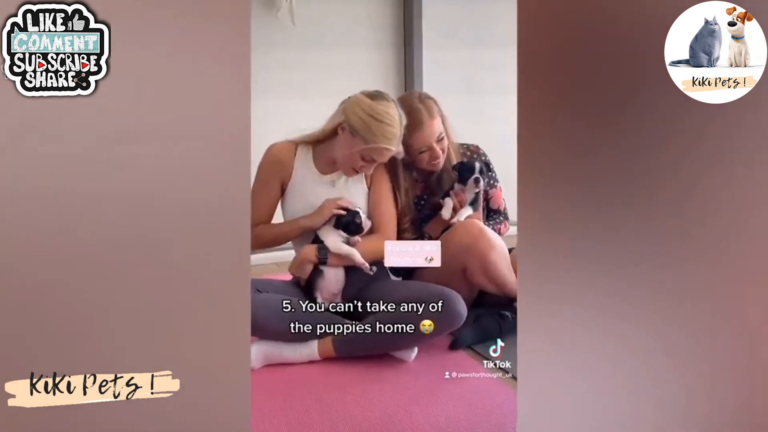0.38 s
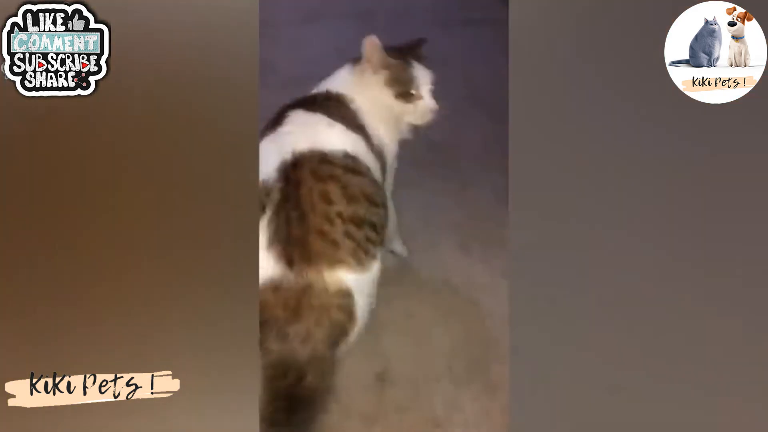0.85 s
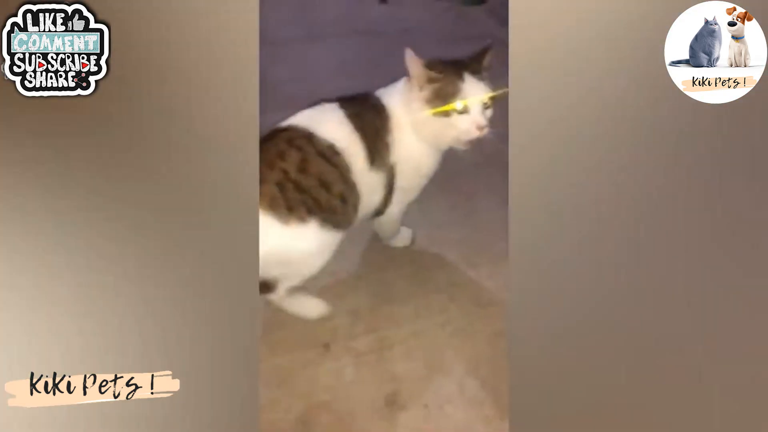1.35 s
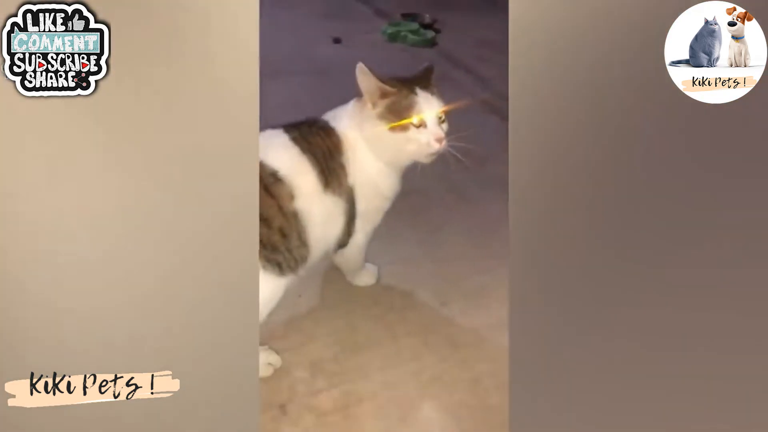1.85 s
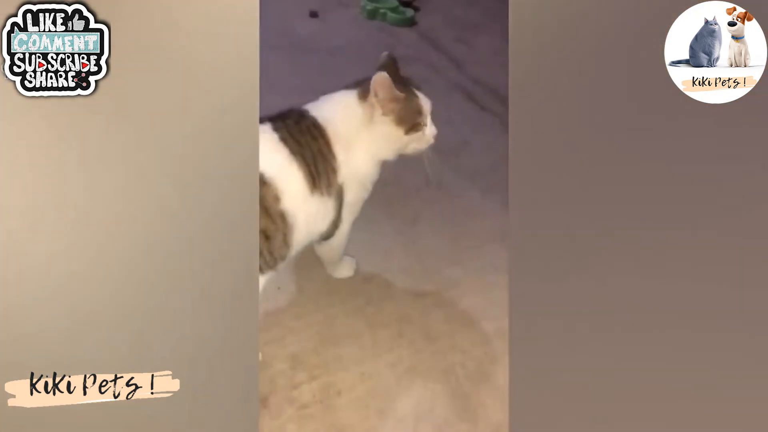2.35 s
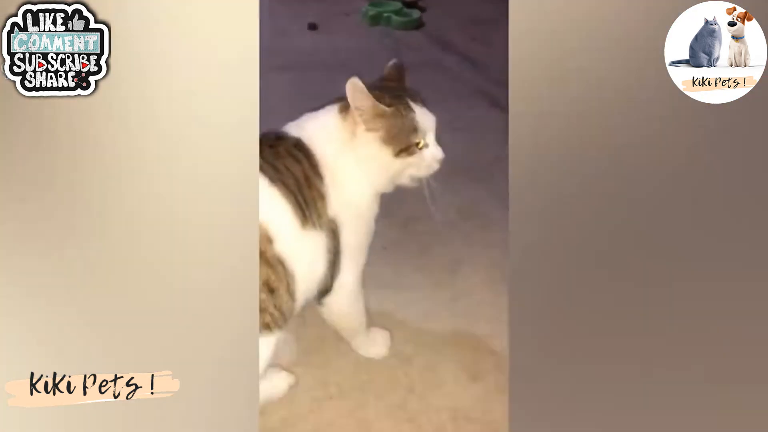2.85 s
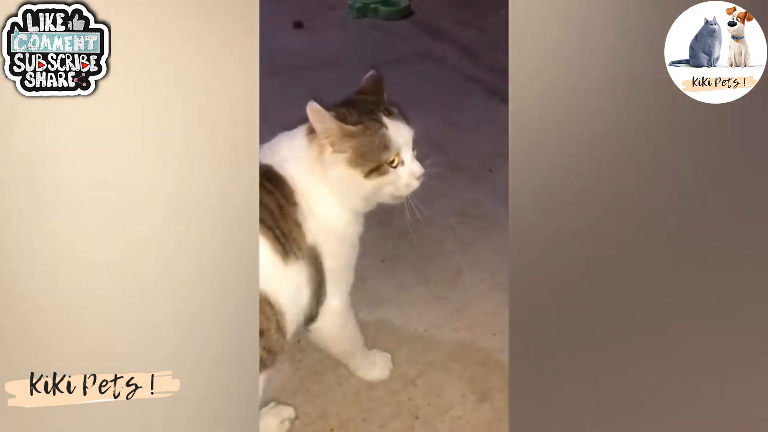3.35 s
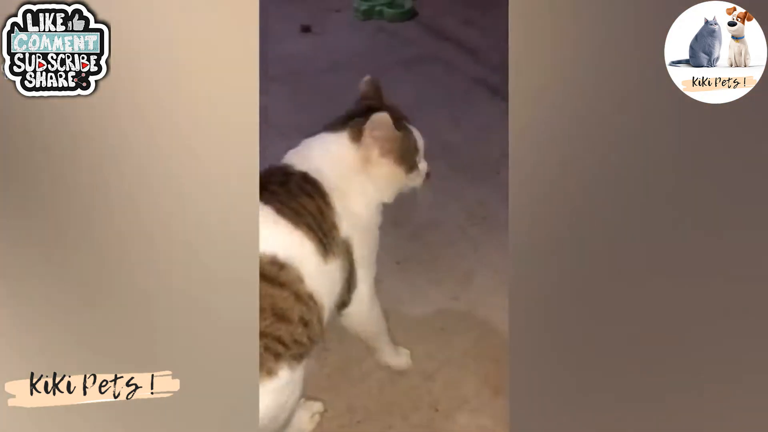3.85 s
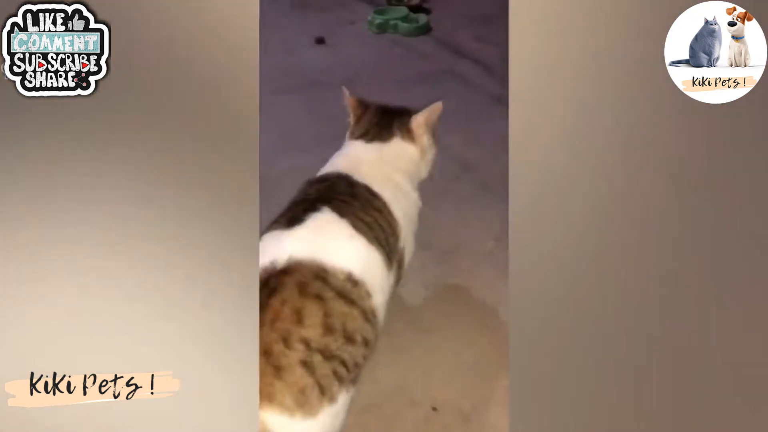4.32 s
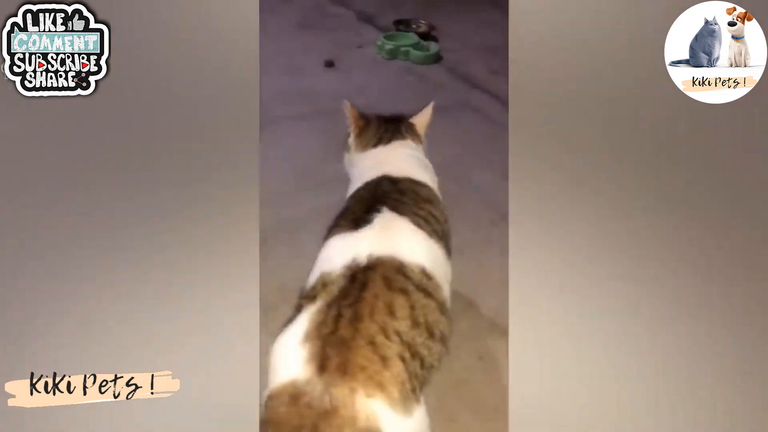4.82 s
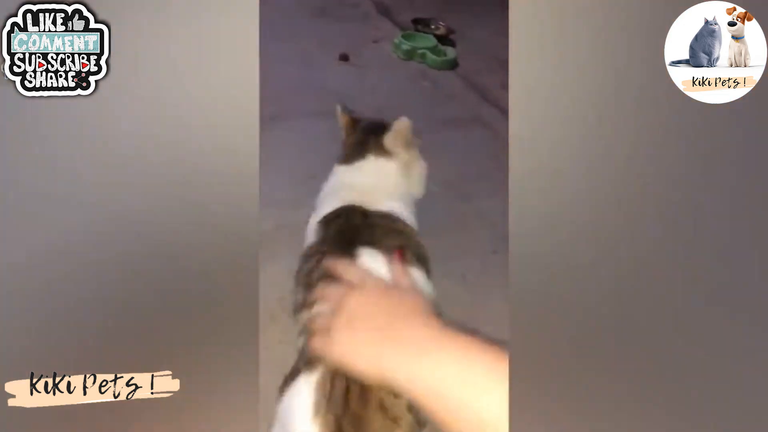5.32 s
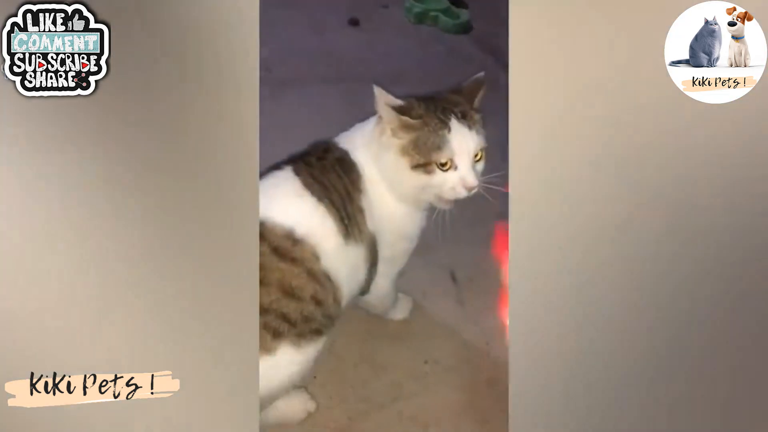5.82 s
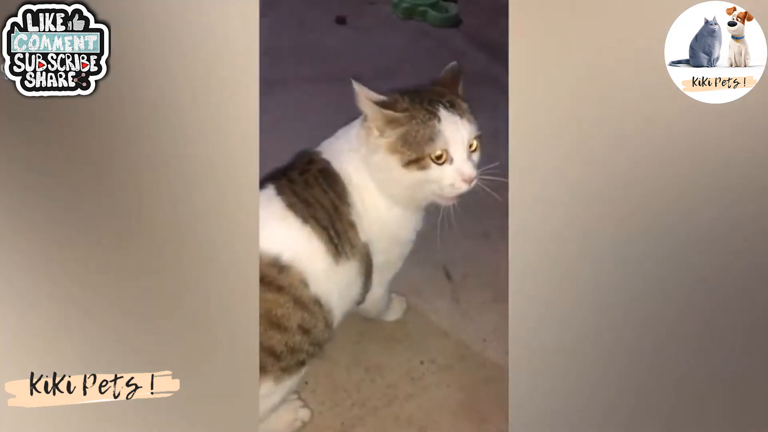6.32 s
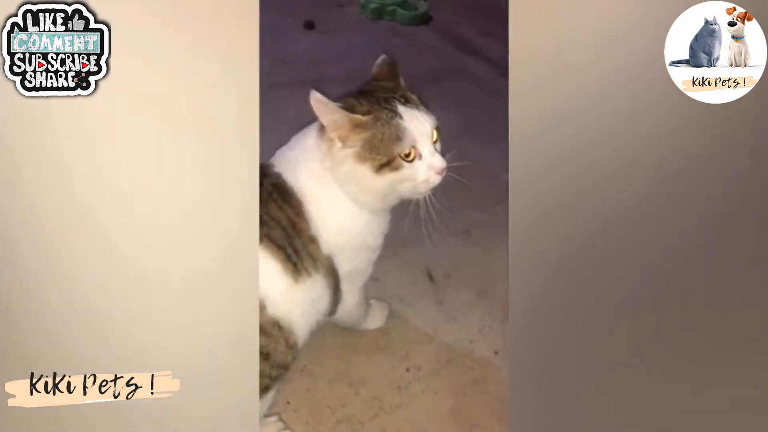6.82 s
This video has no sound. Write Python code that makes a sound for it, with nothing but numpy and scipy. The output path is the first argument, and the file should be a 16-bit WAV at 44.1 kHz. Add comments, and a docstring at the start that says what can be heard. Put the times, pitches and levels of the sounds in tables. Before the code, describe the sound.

Two drawn-out cat yowls, a small breathy gasp between them, with faint scuffs on paving and a low, distant traffic hum.

```python
"""A paved yard at night: a cat yowls twice, close to a phone. Each yowl is a stack of overtones locked to a
gliding pitch, its balance shifting as the mouth opens and the head turns; the second starts in a hoarse croak.
Fluttering noise makes the gasp between the calls; noise bursts and low thumps make scuffs and footfalls on the
paving. A short decaying noise tail gives the yard's echo, fading tones the echo of an earlier call, and low
coloured noise with slow drones the far traffic."""
import sys
import numpy as np
from scipy import signal
from scipy.fft import rfft, irfft, next_fast_len
from scipy.io import wavfile
from scipy.ndimage import map_coordinates

SR = 44100
rng = np.random.default_rng(int(sys.argv[2]) if len(sys.argv) > 2 else 0)


def output_pcm(signal):
    """Save a mono or channel-first signal as 16-bit PCM at the path in sys.argv[1].

    Samples are clipped to [-1, 1] before scaling.
    """
    pcm = np.clip(np.atleast_2d(signal).T, -1, 1) * 32767
    wavfile.write(sys.argv[1], SR, np.round(pcm).astype(np.int16))


def decibels_to_gain(level_db):
    """Convert a level in decibels to a linear amplitude gain (20 dB per decade)."""
    exponent = np.asarray(level_db, float) / 20
    return 10 ** exponent


N = 316638
TIME = np.arange(N) / SR  # [s]

# Levels of each yowl: (time [s], overtone 1 [dB], overtone 2 [dB], overtone 3 [dB], treble [dB])
FIRST_LEVELS = [(0.6, -30.5, -44, -64, -52), (0.65, -38.5, -48.5, -34.5, -34), (0.74, -38, -35.5, -43, -72),
                (0.88, -34.0, -19, -41.5, -45.5), (0.96, -34, -32, -49.5, -62),
                (1.06, -32.5, -23, -40.5, -59), (1.16, -42, -36.5, -48, -63), (1.22, -64, -31, -47, -62.0),
                (1.27, -43, -15, -33, -28.5), (1.34, -31, -16.0, -26.5, -50),
                (1.39, -44, -17.5, -19.5, -42), (1.53, -38.5, -21, -18, -30), (1.66, -40, -11, -25, -50),
                (1.73, -27.5, -35, -44, -50.5), (1.81, -35, -8, -35, -39.5), (1.92, -37.5, -19, -16, -40),
                (2.05, -34, -13, -27.5, -62.5), (2.17, -28, -33.5, -55, -60.5),
                (2.34, -36.5, -26, -43, -58), (2.4, -47, -38.5, -49, -71), (2.46, -38.5, -38.5, -51, -59),
                (2.56, -36.0, -36.0, -33, -52.5), (2.7, -38, -40, -59, -62), (2.94, -34.5, -59, -53, -73),
                (3.01, -41.5, -43.5, -52.5, -64), (3.17, -31.5, -57, -54.5, -90),
                (3.36, -33.5, -47, -57, -78), (3.44, -57, -56, -54, -70), (3.5, -31, -56.5, -59, -68.0),
                (3.6, -48, -66, -71, -65)]
SECOND_LEVELS = [(4.0, -32, -18, -12, -30), (4.03, -38.5, -21, -17, -20), (4.19, -36.5, -25, -17, -32.5),
                 (4.29, -37.5, -21.5, -11, -22.5), (4.36, -36.5, -22.5, -16.5, -25),
                 (4.57, -35.5, -21.5, -9.0, -28.5), (4.74, -36.5, -26.5, -5.5, -30.5),
                 (4.88, -34.5, -18, -17.5, -31.5), (4.97, -31, -15, -36.5, -41.5),
                 (5.15, -32.5, -14.5, -26, -37), (5.39, -32, -13.0, -34.5, -37.5),
                 (5.7, -29.5, -13.0, -32.5, -36.5), (5.93, -31.5, -14.5, -42.5, -37),
                 (6.02, -31, -23.0, -50.0, -38.5), (6.15, -26, -22.0, -52, -41.5),
                 (6.19, -32.0, -21.0, -53, -40), (6.34, -29.5, -15, -45, -40), (6.48, -31, -30, -44.0, -41),
                 (6.63, -30.0, -34.5, -48.5, -56), (6.8, -30.5, -39.0, -43, -55.5),
                 (6.84, -39.0, -51, -61, -65), (6.93, -60.5, -57, -76.5, -68.0)]
# Pitch of each yowl: (time [s], pitch [Hz])
FIRST_PITCH = [(0.6, 175), (0.64, 259.6), (0.701, 332), (0.75, 368.7), (0.84, 399.6), (1.161, 448),
               (1.259, 439.5), (1.409, 498.3), (1.5, 516.1), (1.62, 510.4), (1.67, 489), (1.76, 503.6),
               (1.801, 484.5), (1.96, 495.7), (2.24, 449.2), (2.33, 418.4), (2.61, 370.7), (2.68, 379),
               (2.86, 368.9), (3.13, 377.4), (3.22, 367.6), (3.48, 329.7), (3.52, 306), (3.6, 306.5)]
SECOND_PITCH = [(4.001, 532), (4.111, 501.6), (4.149, 511.8), (4.209, 499.7), (4.33, 552.4), (4.43, 552.2),
                (4.598, 529.4), (4.76, 527.7), (4.881, 514.4), (4.961, 488.3), (5.39, 448.1), (5.73, 431.4),
                (5.97, 409.3), (6.101, 428), (6.14, 424.4), (6.201, 403.8), (6.49, 386.3), (6.731, 389),
                (6.79, 359), (6.82, 307), (6.851, 349.5), (6.93, 332)]
# Mouth resonance, rising as the jaw opens: (time [s], mouth [Hz], upper over lower throat resonance [dB])
MOUTH_AND_THROAT = [(.8, 2190, -36), (1.25, 2110, -17), (1.499, 2813, -20), (1.798, 2445, -15),
                    (2.0, 2584, -14.5), (2.3, 2250, -3), (4.052, 2550, -9.5), (4.398, 3126, -11.5),
                    (4.799, 2800, -7.5), (4.968, 2367, -10), (5.601, 2120, -11), (5.999, 2030, -11),
                    (6.55, 1963, -22.5)]
# How the throat's ring follows overtone 2, overtone 3 and treble: one slope each [dB per dB]
RING_SLOPES = [0.39, 0.11, 0.44]
# Levels of the same three in full voice, where the ring is at its own setting: one each [dB]
FULL_VOICE_LEVELS = [-15, -30, -35]
# Moments where the voice catches: (middle [s], half length [s], level change [dB])
VOICE_CATCHES = [(1.73, 0.025, -8), (3.303, 0.012, -9), (3.542, 0.012, -11)]
# Uneven beating of the folds before the second yowl settles: (time [s], beats [per s], level [dB])
HOARSE_BEATS = [(3.936, 274, -38), (3.955, 332, -24.5), (3.973, 358, -17), (3.991, 360, -14.5),
                (4.009, 500, -16), (4.042, 640, -32.5), (4.1, 515, -51.5)]
# Colour of the croak: (frequency [Hz], relative level [dB])
CROAK_COLOUR = [(88, -80), (150, -44.5), (312, -13.5), (532, -33), (810, -9.5), (1350, -17), (1570, -2),
                (2030, -25.5), (2720, -22), (3450, -33), (6200, -29), (12000, -60), (15600, -95.5),
                (22000, -120)]
# Air drawn in between the calls: (time [s], level [dB])
GASP_LEVELS = [(3.659, -84.5), (3.72, -56.5), (3.8, -44), (3.882, -57), (3.928, -67)]
# Colour of the gasp: (frequency [Hz], relative level [dB])
GASP_COLOUR = [(290, -34.5), (500, -5.5), (782, -24), (972, -3.5), (1350, 3), (1720, -21), (3910, -22.5),
               (9000, -48), (11700, -95), (19800, -120)]
# Gulps in the gasp and the lips parting: (time [s], relative air level [dB], relative thump level [dB])
GULPS = [(3.782, -22.5, -37), (3.805, -24.5, -35.5), (3.92, -27, -49)]
# Scuffs on the paving: (time [s], relative level [dB], rise [s], t60 [s])
SCUFFS = [(0.6685, -30, 0.0096, 0.094), (0.9567, -29, 0.01, 0.054), (2.2188, -23.5, 0.025, 0.068),
          (2.248, -29.5, 0.013, 0.11), (2.3956, -51, 0.0088, 0.36), (2.5095, -43, 0.0028, 0.14),
          (2.606, -37, 0.0068, 0.14), (2.6359, -40.5, 0.0053, 0.14), (3.237, -52, 0.0034, 0.062),
          (3.343, -53, 0.0044, 0.078), (3.5759, -31, 0.0074, 0.047), (6.8176, -38.5, 0.014, 0.04)]
# Colour of the grit, used from its second row on: (frequency [Hz], relative level [dB])
GRIT_COLOUR = [(1470, -39), (2500, -10), (4840, -10), (5280, -9), (6820, -13.5), (10000, -13),
               (12500, -27.5), (16200, -56.5), (22000, -120)]
# Faint rustle of fur and clothes as cat and person move: (time [s], relative level [dB])
RUSTLE_LEVELS = [(.55, -73), (.65, -56.5), (2.2, -56.5), (2.75, -56.5), (2.9, -62), (3.4, -56), (3.7, -58),
                 (6.8, -62), (7.1, -59.5)]
# Soft footfalls: (time [s], relative level [dB], tone [Hz])
FOOTFALLS = [(0.953, -51, 300), (2.299, -50, 175), (2.416, -53, 223.6), (2.614, -42, 180.8),
             (2.678, -47, 256.5), (5.19, -42.5, 210.2)]
# Decay of the yard's echo: (frequency [Hz], t60 [s])
YARD_DECAY = [(300, 0.8), (1500, 0.55), (8000, 0.067)]
# Fading overtones of the earlier call: (frequency [Hz], starting level [dB], t60 [s])
EARLIER_OVERTONES = [(438, -49.5, 0.53), (800, -49, 0.52), (880, -36, 0.14), (1310, -47, 0.34),
                     (1370, -48, 0.69), (1820, -53, 0.37), (2250, -45, 0.12), (2760, -56, 0.26)]
# Colour of the night air and traffic: (frequency [Hz], relative level [dB])
NIGHT_COLOUR = [(15, -57.5), (30, -16.5), (40, 9.5), (50, 1.5), (87, 5.5), (355, 2), (581, -7.5), (978, -6),
                (1440, -10.5), (1970, -12.5), (2840, -17), (5000, -22), (11000, -30.5)]
# Far engines droning in turn: (middle [s], length [s], tone [Hz], level [dB])
DRONES = [(0.49, 1.4, 175.7, -61.5), (2.693, 1.3, 99.6, -57), (6.35, 0.91, 71.9, -58)]


def unit(x):
    """Scales a sound to rms 1."""
    return x / np.sqrt(np.mean(x ** 2) + 1e-20)


def along(points, hz):
    """Reads (frequency [Hz], value) points on a log frequency axis."""
    f, v = np.transpose(points)
    return np.interp(np.log(hz + 1), np.log(f + 1), v)


def wobble(rate, t=TIME):
    """A smooth random curve with that many knots a second."""
    knots = rng.standard_normal(int(N * rate / SR) + 4)
    return map_coordinates(knots, [t * rate])


def coloured(spectrum):
    """Noise filtered to a spectrum, at rms 1."""
    size = next_fast_len(N)
    gain = decibels_to_gain(along(spectrum, np.fft.rfftfreq(size, 1 / SR)))
    return unit(irfft(rfft(rng.standard_normal(N), size) * gain, size)[:N])


def burst(start, rise, t60):
    """An envelope that swells from its start and dies away exponentially."""
    t = np.arange(SR // 2) / SR
    shape = (1 - np.exp(-t / abs(rise))) * decibels_to_gain(-60 * t / abs(t60))
    return np.pad(shape, (round(start * SR), N))[:N]


def resonance(hz, centre_hz, width_hz):
    """Gain of a flat-topped, steep-sided resonance."""
    return 1 / (1 + ((hz - centre_hz) / width_hz) ** 4)


def brightness(db, pitch):
    """Gain of a resonance: slack folds at low pitch dull it, and a closing mouth shuts it in."""
    tautness = np.clip((pitch - 340) / 50, 0, 1)
    opening = np.clip((db + 63.5) / 8, 0, 1)
    return tautness * decibels_to_gain(db) * opening


def yowl(rows, melody, fourth_db, fourth_share, ring_db):
    """Steady vocal folds: overtones locked to the pitch, the upper ones picked out by moving resonances."""
    span = slice(round(rows[0][0] * SR), round(rows[-1][0] * SR))
    t = TIME[span]
    pitch = np.interp(t, *np.transpose(melody))
    times, *columns = np.transpose(rows)
    *low_db, treble_db = [np.interp(t, times, column) for column in columns]
    times, *columns = np.transpose(MOUTH_AND_THROAT)
    mouth_hz, upper_db = [np.interp(t, times, column) for column in columns]

    mouth_db = treble_db + 1.5
    throat_db = ring_db
    for slope, db, full in zip(RING_SLOPES, [*low_db[1:], treble_db], FULL_VOICE_LEVELS):
        throat_db = throat_db + slope * (db - full)
    # the fourth overtone lies between treble and third, and swells on its own
    between = treble_db + fourth_share * (low_db[2] - treble_db)
    low_db.append(fourth_db + between + 1.7 * wobble(8, t))

    tick = (60 * t - 0.4) % 1 - 0.5  # the tone ticks faintly sixty times a second
    slip = 0.06 * decibels_to_gain(wobble(30, t)) * tick
    phase = 2 * np.pi * np.cumsum(pitch * (1 + 0.00064 * wobble(60, t))) / SR + slip
    blur = 0.022 * wobble(500, t)  # breath smears the high overtones
    voice = 0
    for k, db in enumerate(low_db, 1):
        gain = decibels_to_gain(db + 0.13 * wobble(36, t)) * np.sqrt(2)
        voice = voice + gain * np.sin(k * phase - k * k * 0.6)

    mouth_gain, throat_gain = brightness(mouth_db, pitch), brightness(throat_db, pitch)
    for k in range(5, 24):
        hz = k * pitch
        lower = resonance(hz, 2.01 * mouth_hz, 240)  # the lower throat resonance stays near twice the mouth's
        upper = decibels_to_gain(upper_db) * resonance(hz, 6165, 430)
        throat = lower + upper + decibels_to_gain(-5.5 - 1.1 * k)  # a floor between the resonances
        gain = mouth_gain * resonance(hz, mouth_hz, 340) + throat_gain * throat
        swell = decibels_to_gain(3.5 * wobble(9, t))  # each overtone swells on its own
        voice += gain * swell * np.sin(k * (phase + blur - k * 0.49))

    hiss = coloured([(2600, -12.5), (3700, -20), (5500, -6), (6250, -1), (7000, -6.5), (11000, -26.5)])
    breath = decibels_to_gain(throat_db - 15 + 2.9 * wobble(29, t)) * hiss[span]
    shimmer = 1 + decibels_to_gain(-36.5) * unit(np.diff(wobble(300, t), prepend=0))
    catch = decibels_to_gain(sum(db * np.exp(-((t - middle) / half) ** 4) for middle, half, db in VOICE_CATCHES))
    fade = np.clip(np.minimum(t - t[0], t[-1] - t) / 0.017, 0, 1)  # 17 ms at either end
    return np.pad(catch * fade * (voice * shimmer + breath), (span.start, N - span.stop))


def croak():
    """Uneven beats smear every overtone into a band; air hisses more as the effort grows."""
    times, rate, db = np.transpose(HOARSE_BEATS)
    span = slice(round(times[0] * SR), round(times[-1] * SR))
    t = TIME[span]
    rate, db = np.interp(t, times, rate), np.interp(t, times, db)
    phase = 2 * np.pi * np.cumsum(rate) / SR
    bands = 0
    for k in range(1, 9):
        gain = decibels_to_gain(along(CROAK_COLOUR, k * rate) + 3.7 * wobble(150, t))
        bands = bands + gain * np.sin(k * phase + 1.46 * wobble(200, t))
    hiss = decibels_to_gain(0.3 * (db + 18) - 5) * coloured(CROAK_COLOUR)[span]
    return np.pad(decibels_to_gain(db) * (unit(bands) + hiss), (span.start, N - span.stop))


def gasp():
    """Turbulent air in the open mouth: fluttering noise, with short gulps and their low thumps."""
    times, db = np.transpose(GASP_LEVELS)
    air = decibels_to_gain(np.interp(TIME, times, db, -120, -120) + 3.2 * wobble(90))
    thumps = 0
    for start, air_db, thump_db in GULPS:
        air = air + decibels_to_gain(air_db + 3) * burst(start, 0.0034, 0.022)
        tone = np.sin(2 * np.pi * 150 * (TIME - start))
        thumps = thumps + decibels_to_gain(thump_db + 12) * burst(start, 0.00276, 0.086) * tone
    return air * coloured(GASP_COLOUR) + thumps


def feet():
    """Friction on grit as grainy noise in scuffs and rustles, and dull footfalls as short decaying tones."""
    grains = decibels_to_gain(3 * wobble(400))
    grit = unit(grains * coloured([(200, -9.5), (1200, -4.5)] + list(GRIT_COLOUR)[1:]))
    rustle = decibels_to_gain(np.interp(TIME, *np.transpose(RUSTLE_LEVELS)) + 3.8 * wobble(20))
    scuffs = sum(decibels_to_gain(db + 0.5) * burst(start, rise, t60) for start, db, rise, t60 in SCUFFS)
    footfalls = 0
    for start, db, hz in FOOTFALLS:
        tone = np.sin(2 * np.pi * hz * (TIME - start))
        footfalls = footfalls + decibels_to_gain(db + 5.5) * burst(start, 0.0015, 0.13) * tone
    return (scuffs + rustle) * grit + footfalls


def yard(x):
    """The walls' answer: a noise tail, 600 samples late, in which each frequency dies at its own speed."""
    hz, t, bins = signal.stft(rng.standard_normal(SR // 2), SR, nperseg=256)
    decay = decibels_to_gain(-60 * t / along(YARD_DECAY, hz)[:, None])
    tail = signal.istft(bins * decay, SR, nperseg=256)[1]
    return signal.fftconvolve(np.pad(x, (600, 0)), tail / np.linalg.norm(tail))[:N]


def earlier_call():
    """The wavering echo of a call that has just ended: overtones dying away, each at its own speed."""
    echo = 0
    for hz, db, t60 in EARLIER_OVERTONES:
        gain = decibels_to_gain(db + 1.7 * wobble(26) - 60 * TIME / t60)
        echo = echo + gain * np.sin(2 * np.pi * hz * TIME + 7 * rng.random())
    return echo


def night():
    """Far traffic and air: coloured noise drifting a little, and engine tones that come and go."""
    drones = 0
    for middle, length, hz, db in DRONES:
        passing = np.exp(-((TIME - middle) / length * 2) ** 4)
        tone = np.sin(2 * np.pi * hz * TIME + 1.2 * wobble(26))
        drones = drones + decibels_to_gain(db + 4.6 * wobble(10)) * passing * tone
    level = decibels_to_gain(-55 + 0.46 * wobble(0.97) + 0.28 * wobble(23))
    return level * coloured(NIGHT_COLOUR) + drones


def scene():
    """Near sounds, their echo and the background; the head points another way in each yowl."""
    first = yowl(FIRST_LEVELS, FIRST_PITCH, fourth_db=-7.5, fourth_share=0.88, ring_db=-40)
    second = yowl(SECOND_LEVELS, SECOND_PITCH, fourth_db=-4, fourth_share=0.067, ring_db=-42.5)
    near = first + second + croak() + gasp() + feet()
    mix = near + decibels_to_gain(-23) * yard(near) + earlier_call() + night()
    return mix[None]  # one channel


def band_limit(x):
    """A steep low-pass at the top of the band."""
    return signal.sosfilt(signal.butter(12, 15720, fs=SR, output="sos"), x)


def record(dry):
    """The phone cuts steeply above its band limit; the loudest peaks clip."""
    kept = signal.sosfilt(signal.butter(14, 11300, fs=SR, output="sos"), dry)
    ceiling, knee = 0.79, 40  # full scale = 1; a high knee clips abruptly
    clipped = kept / (1 + np.abs(kept / ceiling) ** knee) ** (1 / knee)
    return band_limit(clipped)


dry = scene()
out = record(dry)
output_pcm(out)
```